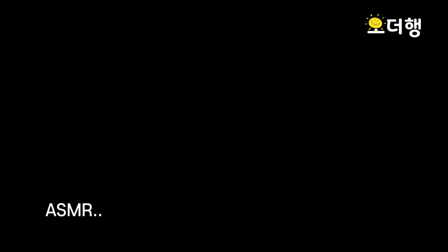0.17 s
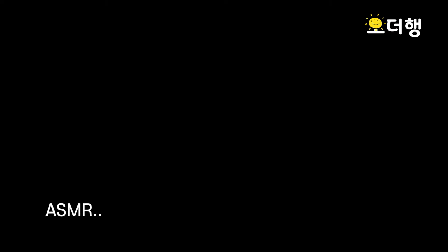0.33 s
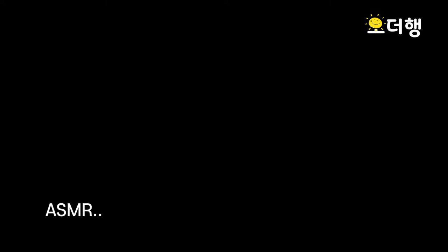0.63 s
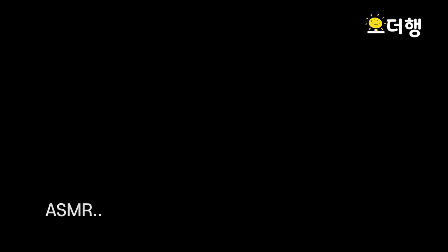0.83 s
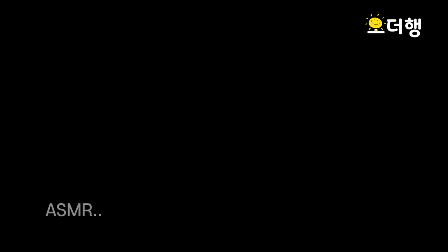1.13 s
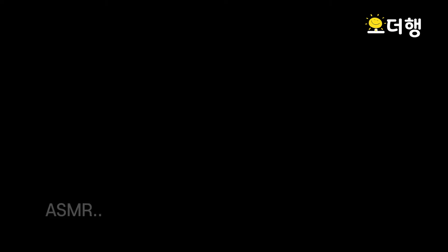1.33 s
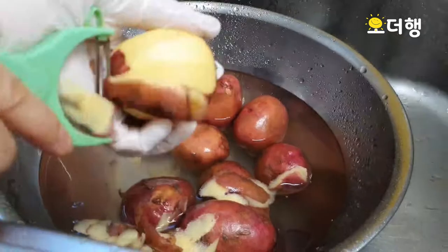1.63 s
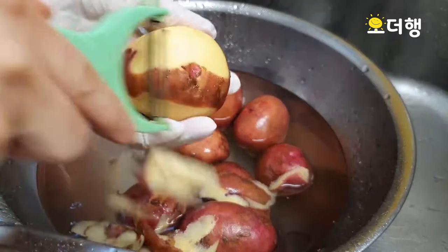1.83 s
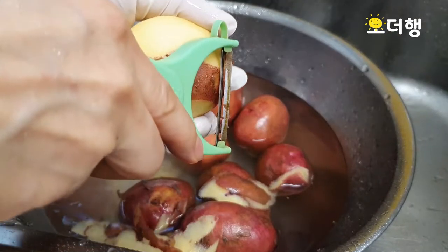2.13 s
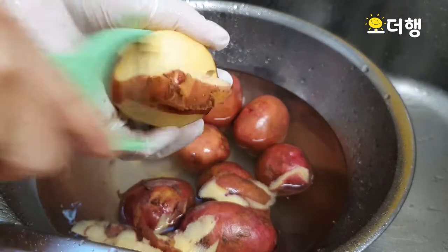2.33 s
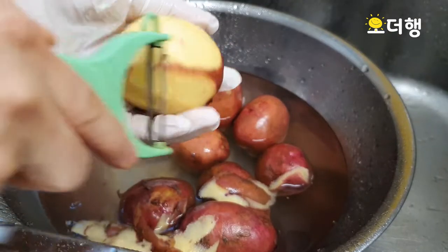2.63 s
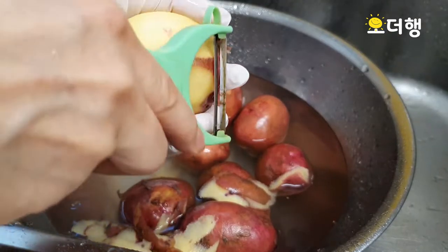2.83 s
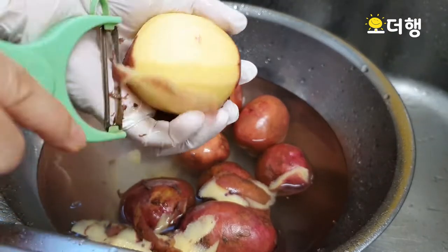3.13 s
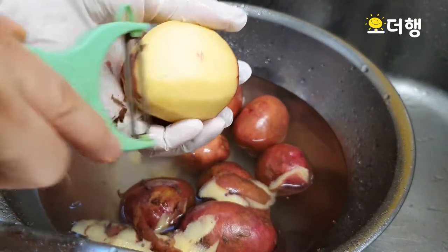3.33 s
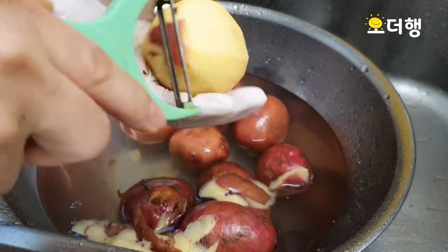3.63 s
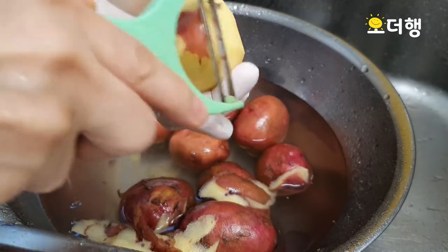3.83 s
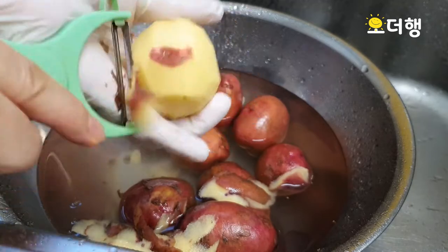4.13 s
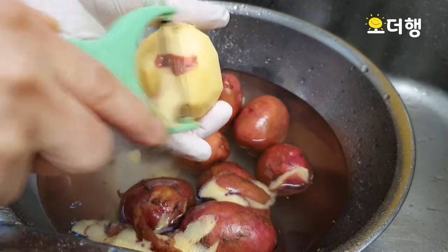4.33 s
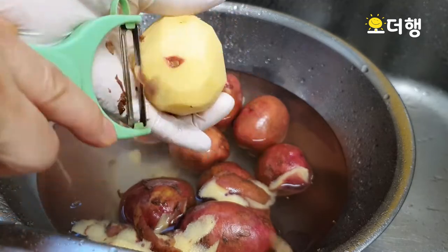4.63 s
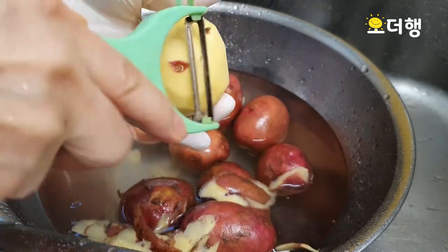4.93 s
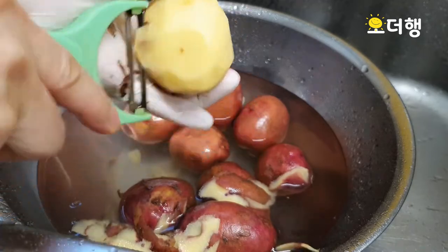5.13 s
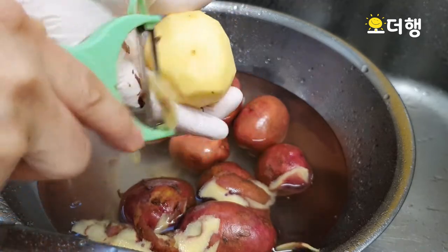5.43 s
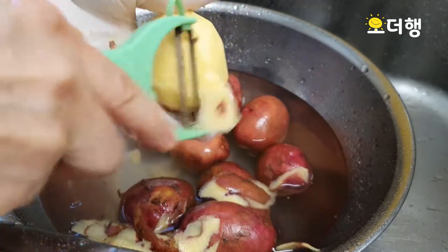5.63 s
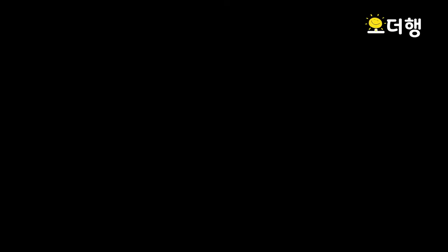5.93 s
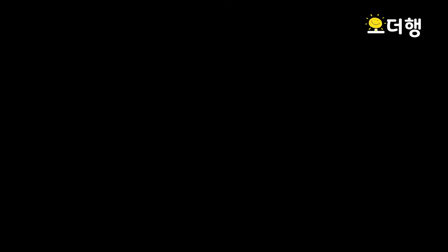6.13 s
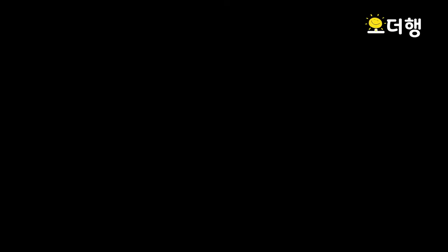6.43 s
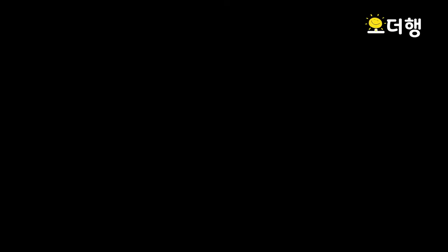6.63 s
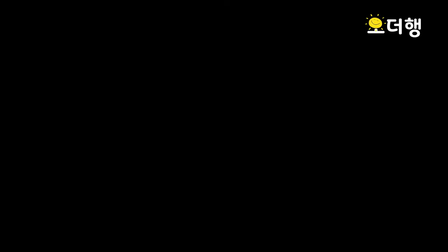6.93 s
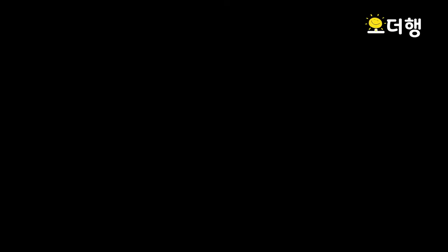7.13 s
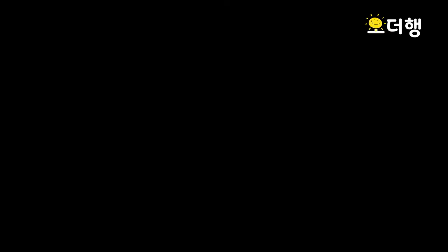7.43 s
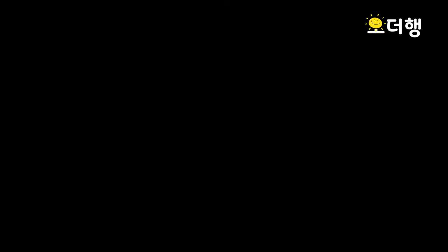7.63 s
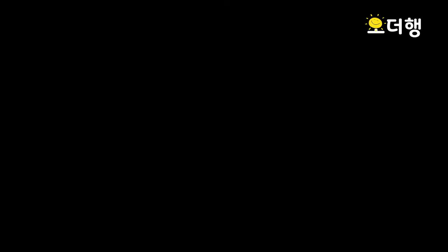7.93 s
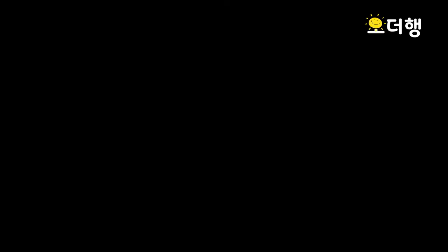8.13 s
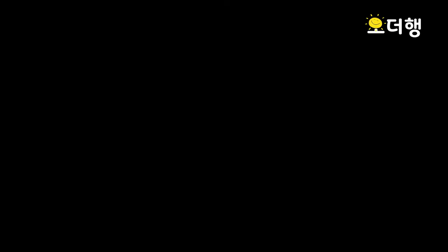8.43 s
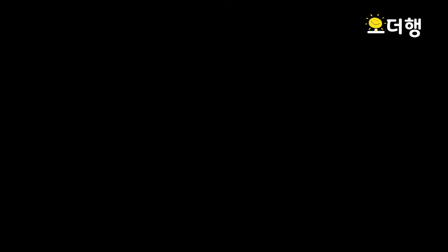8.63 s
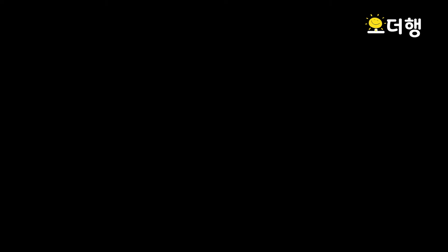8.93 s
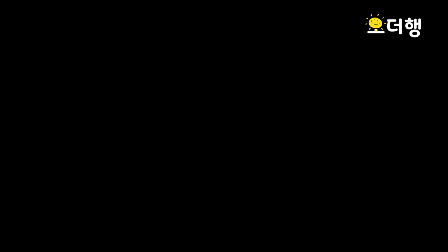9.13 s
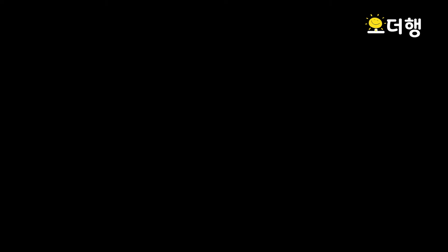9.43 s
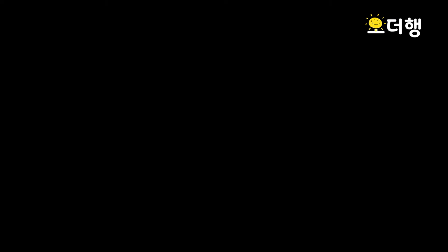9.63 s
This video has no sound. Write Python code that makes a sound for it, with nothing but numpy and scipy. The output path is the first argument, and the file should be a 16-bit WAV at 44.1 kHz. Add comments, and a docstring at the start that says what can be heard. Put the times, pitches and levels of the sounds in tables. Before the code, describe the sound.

A swivel peeler works on a wet raw potato right beside a stereo phone microphone. From 0 to 1.7 s, full rasping strokes start at 0, 0.5 and 1.05 s, amid sharp clacks at 0.6, 0.95, 1.2 and 1.5 s and many little blade ticks. At 1.7 s the tone jumps thinner and brighter; short swelling scrapes come near 2.3, 3.05, 4.1 and 4.55 s, with strong snaps at 4.6, 5.1 and 5.9 s and dull potato taps in the palm. At 6 s it changes again: a lower, clearer metallic ring, toward the left, with longer strokes at 6.35, 7.05, 7.7, 8.8 and 9.4 s, and a quiet gap around 8 s. Soft glove rustle fills between. Short dense kitchen echoes, low fridge hum and dull rumble persist throughout.

```python
"""From 0 s a swivel peeler strokes a wet raw potato close to a two-port phone microphone: torn cells hiss,
the loose blade rings and ticks on landing, or snaps free and knocks the potato into the palm.
Three shots are joined, at 1.68 s and 6 s: blade pitch, hiss colour and port balance change there.
Strokes, ticks and glove rustle go on to the end. Throughout, a small hard kitchen answers with dense
echoes, a fridge hums in steady motor lines and filtered noise makes a dull room rumble."""
import sys
import numpy as np
from scipy import signal
from scipy.fft import rfft, irfft
from scipy.io import wavfile
from scipy.ndimage import uniform_filter1d

SR = 44100
rng = np.random.default_rng(int(sys.argv[2]) if len(sys.argv) > 2 else 0)


def master(y):
    """Save y as 16-bit WAV."""
    cut = np.clip(np.atleast_2d(y).T, -1, 1)
    pcm = np.round(cut * 32767)  # scale
    wavfile.write(sys.argv[1], SR, pcm.astype(np.int16))


def gain_from_db(level_db):
    """Turn a decibel level (scalar or array-like) into a linear amplitude factor."""
    decades = np.asarray(level_db, float) / 20
    return 10 ** decades


N = 431298

# peeling strokes: (time [s], length [s], peak hiss [dB], swell up to the peak [dB],
# blade ring over hiss [dB], place of the peak along the stroke [0-1])
PEEL_STROKES = [(0, 0.018, -29, -6, 1.5, 0.16), (0.461, 0.13, -31.5, 14, -9, 0.94),
                (1.047, 0.18, -31, 12.5, -6.5, 1), (2.274, 0.12, -32.5, 11, -2, 0.84),
                (3.048, 0.097, -35, 5.5, -1.5, 1), (3.948, 0.053, -45, 5, -5, 0.24),
                (4.085, .055, -34.5, 10.5, -7, 0.82), (4.548, 0.058, -33.5, 18, -2, 0.96),
                (5.054, 0.014, -43.5, -2, -2, .2), (6.35, 0.14, -30.5, 11, -0.5, 0.64),
                (7.038, 0.109, -32.5, 12.5, 6.5, 1), (7.683, 0.11, -37.5, 1, -3.5, 0.9),
                (8.765, 0.029, -42, -2, 1, 0.25), (8.816, 0.1, -35.5, 1.5, -2, 0.9),
                (9.395, 0.13, -35.5, 9, 1.5, 0.84)]
# ring gained along a stroke, one per shot: (gain [dB])
STROKE_RING_GROWTH = [5.5, 5, -3.5]
FLESH_OVER_HISS_DB = -7
ATTACK_S, LET_GO_S = 0.0022, 0.021
BITE_S, BITE_DB = 0.038, -6  # the blade sinks in from this far below
EASE_DB_PER_S = 121  # the hiss sinks after the peak


def strokes():
    """Cutting tears cells (hiss at either blade end), rings the blade and shakes the flesh."""
    t, gain = np.arange(N) / SR, np.zeros((3, N))
    for s, length_s, db, swell_db, ring_db, peak in PEEL_STROKES:
        growth_db = STROKE_RING_GROWTH[shot_at(s)]
        along = np.clip((t - s) / length_s, 0, 1)
        fade = np.clip(np.minimum((t - s) / ATTACK_S, (s + length_s - t) / LET_GO_S + 1), 0, 1)
        hiss_db = db - swell_db * np.clip(1 - along / peak, 0, 1)
        hiss_db -= EASE_DB_PER_S * length_s * np.clip(along - peak, 0, 1)
        hiss_db += BITE_DB * np.clip(1 - (t - s) / BITE_S, 0, 1)
        blade_db = hiss_db + ring_db + growth_db * (along - 0.5)
        gain += fade * gain_from_db([hiss_db, blade_db, hiss_db + FLESH_OVER_HISS_DB])
    gain += handling()
    skin = tearing(2.6, 2.4, count=2)
    grip = tearing(3.2, 1.5, count=1)[0]
    flesh = tearing(2.0, 1.2, count=1)[0]
    near_hiss, far_hiss = cut_hiss(skin)
    blade = by_shot(lambda k: unit(blade_ring(grip, k, True)))
    body = unit(potato_body(flesh))
    hiss_gain, blade_gain, body_gain = gain
    return np.array([hiss_gain * near_hiss, hiss_gain * far_hiss, blade_gain * blade, body_gain * body])


def tearing(chatter_db, spread_db, count):
    """Dense cell ruptures of uneven size; the blade digs and slips at 170 fresh levels a second."""
    sizes = gain_from_db(spread_db * rng.exponential(size=(count, N)))
    return unit(rng.standard_normal((count, N)) * sizes * gain_from_db(chatter_db * walk(170)))


# spectrum of the cutting hiss, one list per shot: (frequency [Hz], relative level [dB])
CUT_SPECTRA = [
    [(880, -32.5), (1500, 1), (3090, -3.5), (4550, -9.5), (11500, 2.5), (16000, -7.5)],
    [(2650, -43), (4500, -14), (7450, -0.5), (8780, -1), (15000, -0.5), (16000, -23)],
    [(2000, -42.5), (3400, -17.5), (7070, -9), (8870, -11.5), (12000, -8), (16000, -15.5)],
]


def cut_hiss(skin):
    """Tearing noise coloured by the cut, rms 1 in each shot's spectrum."""
    return by_shot(lambda k: unit(colour(skin, CUT_SPECTRA[k])))


# gloved hand turning the potato, blade sliding back: (time [s], level before the shares below [dB])
GLOVE_HANDLING = [(0, -53), (0.9, -63), (1.45, -61), (1.65, -48), (1.9, -64), (2.22, -80), (3.5, -73),
                  (4.25, -62), (5.58, -76), (5.8, -61.5), (7.36, -60), (8.1, -77.5), (8.38, -67),
                  (9.22, -64), (9.68, -53.5), (9.78, -66)]


def handling():
    """Unsteady rustle of the hand, shared out as gains on hiss, blade ring and body."""
    level_db = np.interp(np.arange(N) / SR, *np.transpose(GLOVE_HANDLING))
    shares_db = np.array([[-5.0], [-9.0], [-16.0]])
    return gain_from_db(level_db + 3.0 * walk(40)) * gain_from_db(shares_db)


SECOND_MODE_RATIO = 2.08  # pitch over the first mode
LOADED_RATIO = 0.945  # pitch pressed into the flesh over free
LOADED_MUTE_DB = 14


def blade_ring(x, shot, loaded):
    """Two bending modes of the blade, set by the grip; flesh lowers both and mutes the second."""
    _, hz, width_hz, second_db, *_ = SHOT_SETTINGS[shot]
    hz = hz * LOADED_RATIO ** loaded

    def mode(ratio):
        narrow = ring(x, ratio * hz, np.sqrt(ratio) * width_hz)
        return ring(narrow, ratio * hz, 3 * ratio * width_hz)

    return mode(1) + gain_from_db(second_db - LOADED_MUTE_DB * loaded) * mode(SECOND_MODE_RATIO)


# potato in the palm: (frequency [Hz], width [Hz], level [dB])
BODY_MODES = [(639, 177, 2), (1188, 750, 0.5), (1829, 390, -6)]


def potato_body(x):
    """Broad low resonances of the potato held in the palm."""
    return sum(gain_from_db(db) * ring(x, hz, width_hz) for hz, width_hz, db in BODY_MODES)


# blade slapping down or snapping free: (time [s], crack peak [dB],
# blade ring over crack [dB], thud over crack [dB])
HARD_KNOCKS = [(0.0413, -11, -8.5, -15), (0.6, -7.5, -10.5, -25), (0.9522, -7, -15, -15),
               (1.2304, -8.5, -32, -22), (1.5291, -8.5, -29, -17.5), (2.3982, -16, -1.5, -20),
               (2.5617, -29, 3, -12.5), (3.1523, -15.5, -11, -13), (3.3258, -27.5, 3.5, -13),
               (3.7606, -24.5, 1, -10.5), (4.1232, -14, -16, -13), (4.4726, -25, -1, -9.5),
               (4.61, -7.5, -10.5, -14.5), (4.783, -20, -3, -16), (5.014, -29, -6.5, -8),
               (5.093, -21.5, -6, -1.5), (5.1251, -8.5, -12, -11.5), (5.24, -26, -4, -5.5),
               (5.6254, -12, -5.5, -11.5), (5.88, -9, -8.5, -8), (6.0235, -9.5, -8.5, -20.5),
               (6.8731, -15.5, -2, -10.5), (7.1423, -15.5, -20, -13), (8.4272, -27, -5.5, -14.5),
               (8.5984, -19, -4, -17.5), (8.9243, -11.5, -35, -14.5), (9.2766, -13.5, -6.5, -20),
               (9.5192, -13.5, -40, -15.5)]
THUD_LEAD_S = 0.001472


def knocks():
    """Cracks hard enough to knock the potato into the palm; the thud starts just ahead."""
    out = np.zeros((4, N))
    for s, crack_db, ring_db, thud_db in HARD_KNOCKS:
        crack(out, s, crack_db, ring_db)
        push = ragged_push(0.003, 0.15, 0.02)[0]
        add(out[3], s - THUD_LEAD_S, potato_body(push), crack_db + thud_db)
    return out


# blade touching down or rattling in its pivots: (time [s], crack peak [dB])
LIGHT_TICKS = [(0.1246, -18), (0.221, -28), (0.2704, -27), (0.2841, -10), (0.4738, -34), (0.713, -13.5),
               (0.7384, -14), (0.782, -31.5), (0.798, -25.5), (0.935, -20), (1.017, -34.5), (1.0673, -28),
               (1.2251, -14), (1.3325, -20.5), (1.358, -23.5), (1.506, -28.5), (1.7836, -26.5),
               (1.8153, -31), (1.94, -43.5), (2.0204, -31), (2.0303, -19.5), (2.105, -51), (2.595, -27.5),
               (2.7214, -34.5), (2.832, -37.5), (3.3548, -21), (3.382, -35), (3.508, -48), (3.604, -43),
               (3.622, -52), (3.756, -44), (3.8042, -28), (3.8277, -36), (3.8445, -24.5), (4.2998, -19),
               (4.3236, -27.5), (4.5955, -30), (4.9064, -33), (4.9155, -14.5), (4.983, -36),
               (5.3862, -32.5), (5.456, -41.5), (5.4956, -48), (5.6798, -24.5), (5.7212, -25), (5.955, -23),
               (6.357, -41), (6.4929, -15.5), (6.6194, -37), (6.6596, -24), (7.272, -40.5), (7.466, -40.5),
               (7.99, -57.5), (8.195, -67), (8.298, -74), (8.519, -49), (8.5908, -30), (8.826, -32),
               (9.037, -37), (9.0466, -32), (9.6335, -35), (9.658, -41)]
TICK_RING_DB, TICK_RING_SLOPE = -30.5, 0.55  # ring of a -23 dB crack; dB of ring per dB of crack


def ticks():
    """Light blade contacts; the ring grows less than the crack does."""
    out = np.zeros((4, N))
    for s, crack_db in LIGHT_TICKS:
        ring_db = TICK_RING_DB + TICK_RING_SLOPE * (crack_db + 23)
        crack(out, s, crack_db, ring_db - crack_db)
    return out


def crack(out, s, crack_db, ring_over_crack_db):
    """A contact wakes the frame, taps the flesh and sets the blade jittering on the skin."""
    push = ragged_push(0.00059, 0.16, 0.012, count=2)
    jitter = ragged_push(0.0015, 0.065, 0.024)[0]
    click = 0.53 * np.diff(push, prepend=0)
    _, _, blade, body = out
    add(out[:2], s, peeler_frame(push) + click, crack_db)
    add(body, s, ring(jitter, *BODY_MODES[-1][:2]), crack_db - 18.0)
    add(blade, s, blade_ring(jitter, shot_at(s), False), crack_db + ring_over_crack_db)


# peeler frame: (frequency [Hz], width [Hz], level before the random mix [dB])
FRAME_MODES = [(3840, 1100, -3), (5920, 510, -1.5), (6680, 330, -3), (7780, 260, -2), (8940, 950, -0.5),
               (11640, 2300, -4), (13050, 3000, -25.5)]


def peeler_frame(push):
    """Frame modes, excited in a different random mix at each contact."""
    mix = gain_from_db(4.5 * rng.standard_normal(len(FRAME_MODES)))
    return sum(g * gain_from_db(db) * ring(push, hz, width_hz) for g, (hz, width_hz, db) in zip(mix, FRAME_MODES))


def ragged_push(quick_s, drag, drag_s, count=1):
    """Noise shaped as a short push, two weaker rebounds and a scratchy drag behind."""
    t = np.arange(8000) / SR
    shape = drag * np.exp(-t / drag_s) * (1 - np.exp(-t / 0.00056))
    rebounds = rng.uniform((0.0015, 0.05), (0.009, 0.35), (2, 2))  # (delay [s], size)
    for late_s, size in [(0, 1), *rebounds]:
        since = np.maximum(t - late_s, 0)
        shape += size * np.exp(-since / quick_s) * (1 - np.exp(-since / 0.00042))
    return rng.standard_normal((count, len(t))) * shape


ROOM_T60_S, ROOM_TREBLE_T60_S, ROOM_DB = 0.36, 0.33, -7


def kitchen(x):
    """Dense echoes, different at each port; the treble dies first."""
    t = np.arange(int(0.6 * SR)) / SR
    noise = rng.standard_normal((2, len(t)))
    low = signal.lfilter(*signal.butter(2, 4500, fs=SR), noise)
    tail = low * gain_from_db(-60 * t / ROOM_T60_S) + (noise - low) * gain_from_db(-60 * t / ROOM_TREBLE_T60_S)
    tail *= 1 - np.exp(-t / 0.00033)
    tail /= np.sqrt(np.sum(tail ** 2) / 2)
    return gain_from_db(ROOM_DB) * signal.fftconvolve(x[None], tail, axes=1)[:, :N]


# motor lines: (frequency [Hz], level before wavering [dB rms], sounding from [s])
HUM_LINES = [(59, -43.3, 0), (73.5, -58.5, 0), (131, -53.5, 1.68), (236.5, -58, 0), (295, -60.5, 0)]
HUM_LEAD_RAD = 0.15  # left port ahead of right


def fridge():
    """Motor lines, the higher ones wavering more; their phase jumps where shots are joined."""
    t, turns = np.arange(N) / SR, by_shot(lambda k: SHOT_SETTINGS[k][6])
    lead = np.array([[HUM_LEAD_RAD], [-HUM_LEAD_RAD]]) / 2
    hum = np.zeros((2, N))
    for hz, db, start_s in HUM_LINES:
        level = np.sqrt(2) * gain_from_db(db + hz / 160 * walk(3.7)) * (t >= start_s)
        phase_turns = hz * t + turns * hz / HUM_LINES[0][0]
        hum += level * np.sin(2 * np.pi * phase_turns + lead)
    return hum


# room noise spectrum: (frequency [Hz], relative level [dB per Hz])
RUMBLE_SPECTRUM = [(15, -41.5), (25, -18), (70, -7), (102, -12), (145, -14), (180, -11.5), (285, -8.5),
                   (489, -18), (560, -15.5), (1940, -43), (5880, -46.5), (16000, -50)]
RUMBLE_DB = -50.5


def rumble():
    """Dull room noise, alike at both ports in the bass, unrelated in the treble."""
    like = 0.9 / (1 + (np.fft.rfftfreq(N, 1 / SR) / 600) ** 2)
    mid = irfft(rfft(rng.standard_normal(N)) * np.sqrt(1 + like), N)
    side = irfft(rfft(rng.standard_normal(N)) * np.sqrt(1 - like), N)
    ports = np.array([mid + side, mid - side])
    return gain_from_db(RUMBLE_DB + 1.0 * walk(8.8)) * unit(colour(ports, RUMBLE_SPECTRUM))


def unit(x):
    """Scale to rms 1."""
    return x / np.sqrt(np.mean(x ** 2))


def on_log(table, hz):
    """Read (frequency [Hz], value) rows on a log axis."""
    f, v = np.transpose(table)
    return np.interp(np.log(hz + 1), np.log(f), v)


def colour(x, table):
    """Impose a spectrum of (frequency [Hz], level [dB]) points."""
    size = x.shape[-1]
    return irfft(rfft(x) * gain_from_db(on_log(table, np.fft.rfftfreq(size, 1 / SR))), size)


def ring(x, hz, width_hz):
    """One resonance, gain 1 at its centre."""
    return signal.lfilter(*signal.iirpeak(hz, hz / width_hz, SR), x)


def walk(rate_hz):
    """Random levels held 1 / rate_hz and slewed twice; spread near 1."""
    k = int(SR / rate_hz)
    held = np.repeat(rng.standard_normal(N // k + 1), k)
    return 1.4 * uniform_filter1d(uniform_filter1d(held, k), k)[:N]


def add(track, s, x, peak_db):
    """Mix x in at s seconds, scaled to a peak."""
    start = int(s * SR)
    part = track[..., start:start + x.shape[-1]]
    part += gain_from_db(peak_db) * x[..., :part.shape[-1]] / np.abs(x).max()


def shot_at(s):
    """Number of the shot that holds time s."""
    return sum(row[0] <= s for row in SHOT_SETTINGS) - 1


# shots: (time [s], free blade pitch [Hz], blade filter width [Hz], second blade mode [dB],
# left minus right of ring [dB], of hiss [dB], phase of the lowest hum line [turns])
SHOT_SETTINGS = [(0, 3230, 750, -11, 0, 2.5, 0.061), (1.68, 3500, 457, -11, 3.5, 3.3, 0.44),
                 (6, 2740, 250, -12, 13.5, 1.3, 0.805)]


def by_shot(make):
    """Join what make(shot number) gives, each within its own shot."""
    starts_s = [row[0] for row in SHOT_SETTINGS]
    which = np.searchsorted(starts_s, np.arange(N) / SR, side="right") - 1
    return sum((which == k) * make(k) for k in range(len(SHOT_SETTINGS)))


# delay of the right port, one per shot: (lag [samples])
RIGHT_PORT_LAG = [13, 12, 10]
HISS_APART = 0.75  # power share of far-end hiss at the right port
DIRECT_DB, BODY_LEFT_OVER_RIGHT_DB = 2.5, 3.5


def scene():
    """Peeler close by, heard first by the left port, in the kitchen."""
    hiss, far_hiss, blade, body = strokes() + ticks() + knocks()
    ring_db, hiss_db = (by_shot(lambda k: SHOT_SETTINGS[k][c]) for c in (4, 5))
    right_hiss = np.sqrt(1 - HISS_APART) * hiss + np.sqrt(HISS_APART) * far_hiss

    def port(port_hiss, side):
        balanced = port_hiss * gain_from_db(side * hiss_db) + blade * gain_from_db(side * ring_db)
        return gain_from_db(DIRECT_DB) * (balanced + body * gain_from_db(side * BODY_LEFT_OVER_RIGHT_DB))

    left, right = port(hiss, 0.5), port(right_hiss, -0.5)
    late_right = by_shot(lambda k: np.roll(right, RIGHT_PORT_LAG[k]))
    return np.array([left, late_right]) + kitchen(hiss + blade + body) + fridge() + rumble()


def band_limit(x):
    """A steep low-pass at the top of the band."""
    return signal.sosfilt(signal.butter(12, 16990, fs=SR, output="sos"), x)


def record(dry):
    """The phone cuts the top steeply."""
    top_cut = signal.ellip(10, 0.2, 60, 15900, fs=SR, output="sos")
    mix = signal.sosfilt(top_cut, dry)
    return band_limit(mix)


dry = scene()
out = record(dry)
master(out)
```